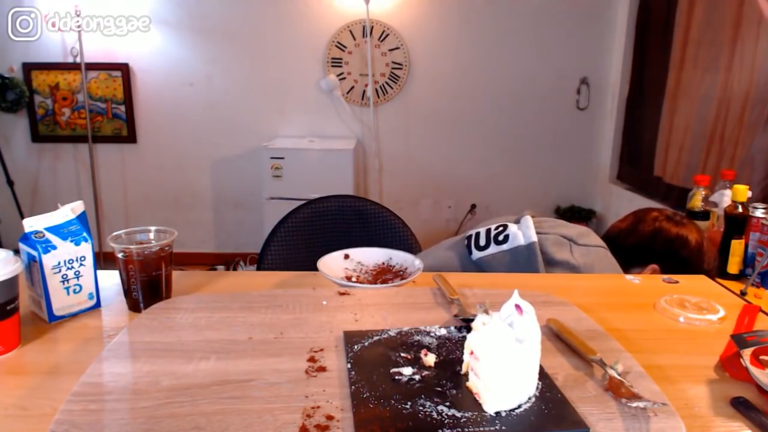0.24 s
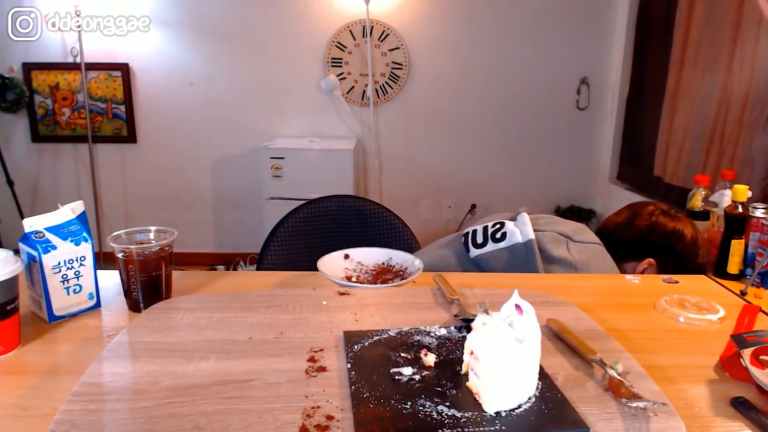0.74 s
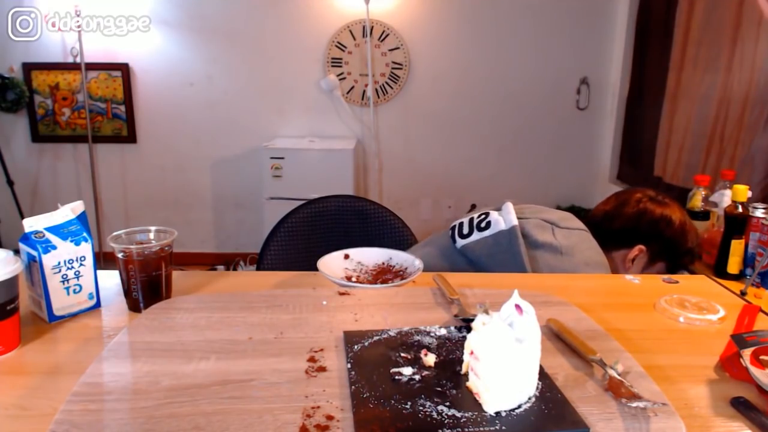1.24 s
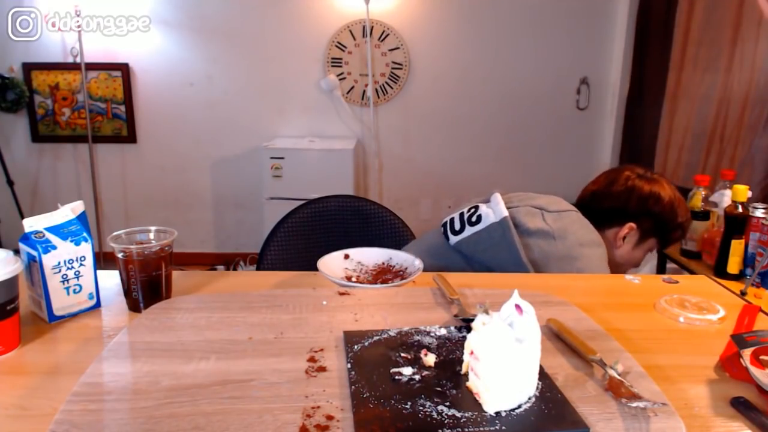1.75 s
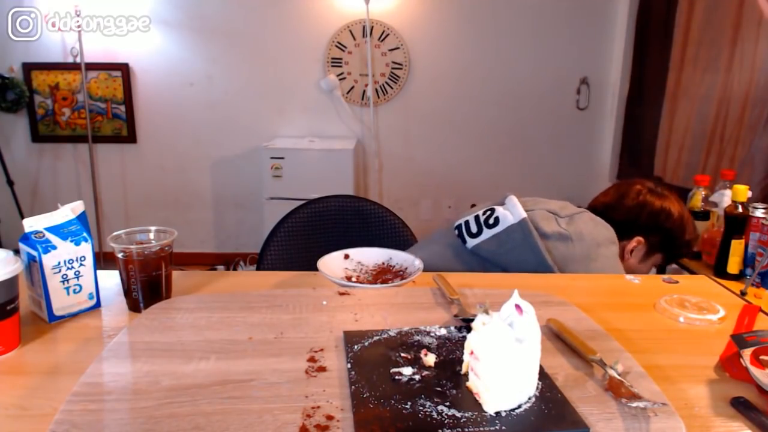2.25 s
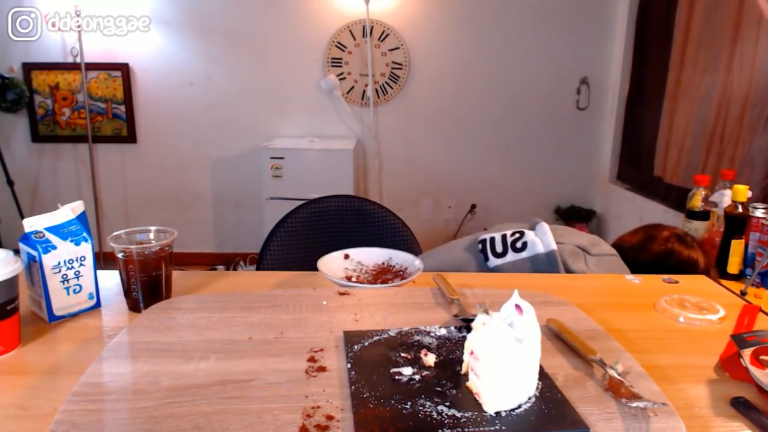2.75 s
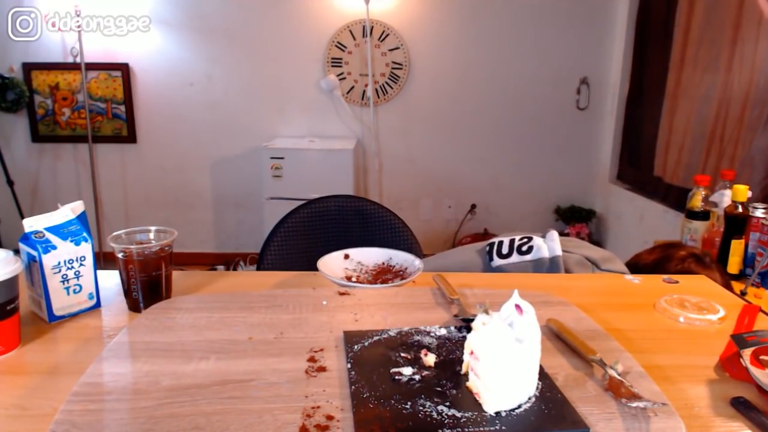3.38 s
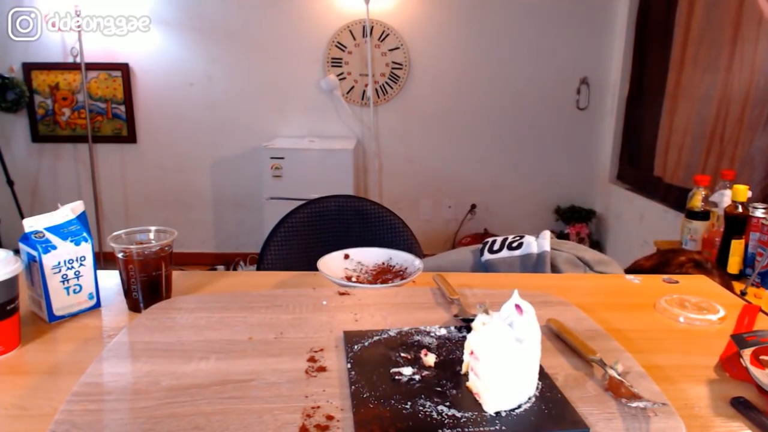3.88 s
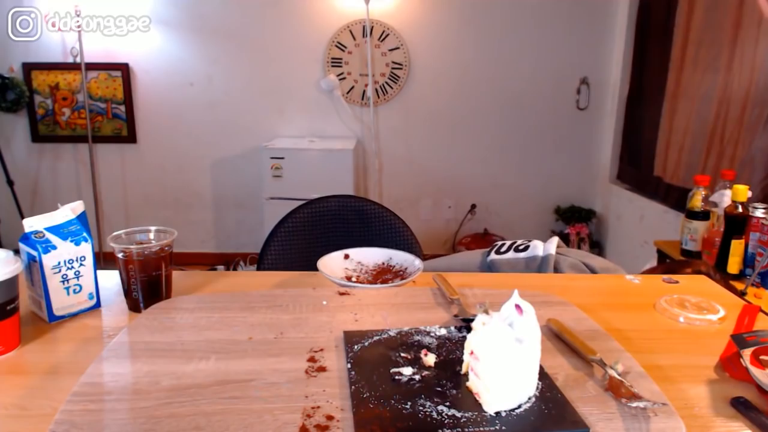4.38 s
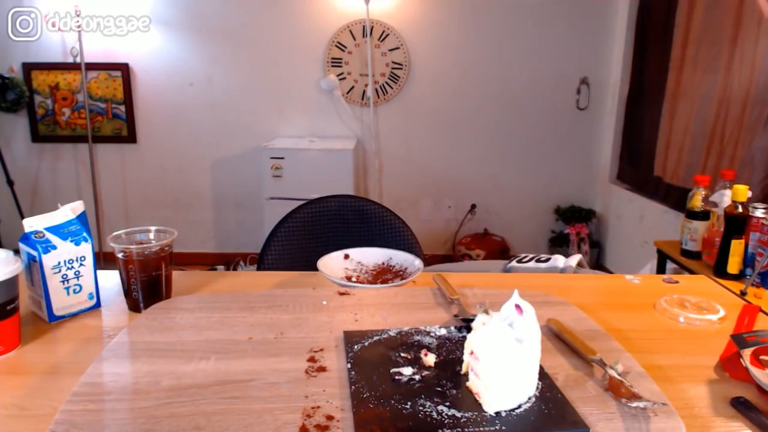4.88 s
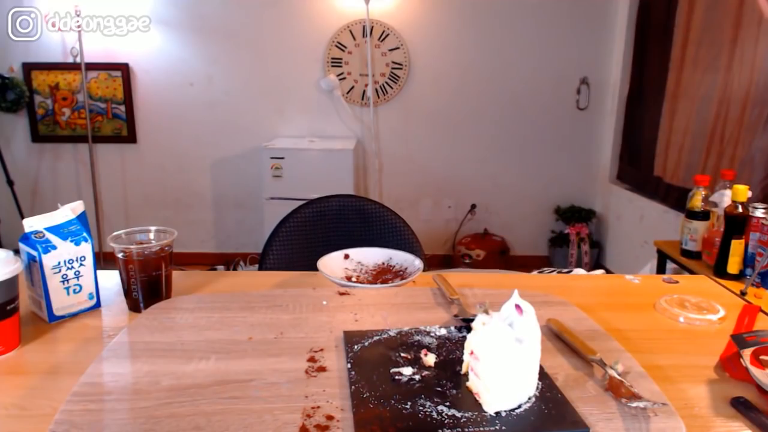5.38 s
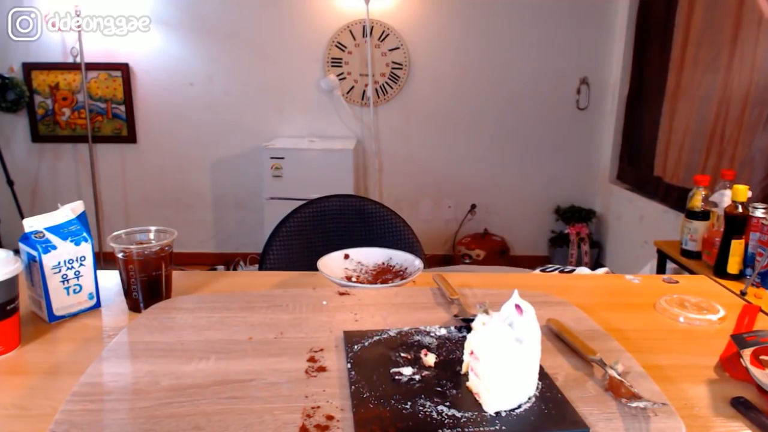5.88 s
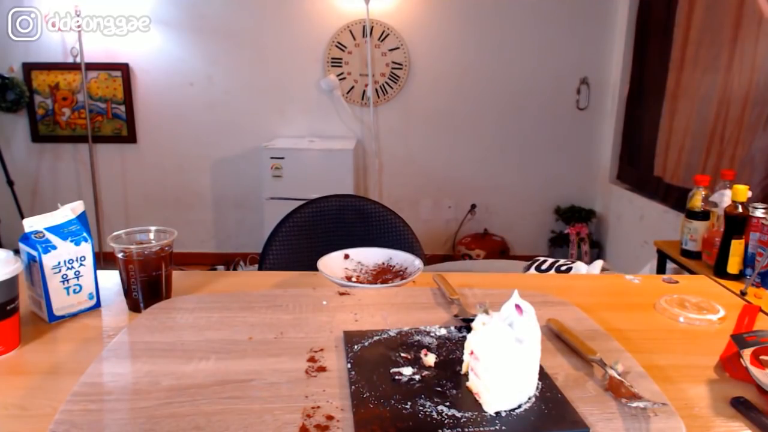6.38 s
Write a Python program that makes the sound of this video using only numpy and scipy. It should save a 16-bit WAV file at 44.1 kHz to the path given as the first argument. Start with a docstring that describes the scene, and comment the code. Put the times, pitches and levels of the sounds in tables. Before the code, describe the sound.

A microwave oven is handled in a bare, reverberant domestic room, with the microphone a few steps away and faint low hum and air noise throughout. At 0 s a hard knock with a short ping, then bumps at 0.2-0.4 s, light taps around 0.7-0.9, a duller heavy thud near 0.95 and smaller knocks to 1.8. At 2.25 s the door pops open with a loud double bang and ringing sheet metal. Rubbing and plastic clicks follow from 2.4 to 2.95, then a bright cluster of clacks at 3.05. Around 3.3 a dish touches down with a tiny squeak; knocks and scrapes continue to 3.9. From 4 to 5.5 only faint slides, ticks and squeaks. A firm knock comes at 5.7, a clear dish clink at 6.2, bumps at 6.45, and at 6.52 a massive, booming door slam, flattened and crackling, cut short by the end.

```python
"""A hard knock with a short ping opens the scene: a microwave oven handled in a bare, echoing room.
The microphone is a few steps away. The door pops open, a dish is knocked and slid about, the door slams.
Blows are noise shaped by the casing and a room tail; door panel, cabinet and dish are damped modes.
Slides are rubbed noise with tiny catches, squeaks are rough glides; air noise and a hum never stop.
The loudest blows overload the input stage, which flattens them and crackles."""
import sys
import numpy as np
from scipy.fft import rfft, irfft, next_fast_len
from scipy.io import wavfile
from scipy.ndimage import map_coordinates

SR = 44100
rng = np.random.default_rng(int(sys.argv[2]) if len(sys.argv) > 2 else 0)


def log_audio(samples):
    """Write samples as a 16-bit WAV file to the path given in sys.argv[1]."""
    # one column per channel
    frames = np.atleast_2d(samples).T
    # limit to full scale, then quantise
    limited = np.clip(frames, -1, 1)
    pcm = np.round(limited * 32767).astype(np.int16)
    wavfile.write(sys.argv[1], SR, pcm)


N = 292383

# The five voices of a contact, deep to bright, ahead of the casing's resonances.
# Each row: frequency in Hz, relative spectrum level in dB.
THUD_VOICE = [(25, -28), (55, 2), (100, 8), (150, 1), (220, -7), (500, -49), (1000, -120)]
BODY_VOICE = [(80, -55), (150, -9), (200, 1.5), (380, -3.5), (560, -12), (1200, -98), (2500, -120)]
KNOCK_VOICE = [(150, -69), (330, -11.5), (450, -1), (750, -3), (1100, -8), (1600, -21), (3000, -24),
               (8000, -110)]
CLACK_VOICE = [(400, -50), (950, -15), (1300, -4.5), (2300, -10.5), (3300, -13), (4500, -18.5), (8000, -29),
               (16000, -71)]
TICK_VOICE = [(1000, -64), (2500, 3.5), (3700, 2), (4700, 1), (6600, 2.5), (9000, -5), (12000, -11.5),
              (16000, -24)]
# Things sliding and shifting in and on the oven, one stroke a row.
# Each row: start in seconds, length in seconds, strength in dB, weight in dB (more rumble),
# hardness in dB (more hiss).
STROKES = [(0.422, 0.12, -48, 6.5, 6), (1.263, 0.17, -47, -2.5, -10), (2.063, 0.11, -42.5, -7.5, -4),
           (2.441, 0.17, -35.5, -2, -11), (2.632, 0.2, -44.5, 9, -2), (2.898, 0.12, -48.5, 4.5, -9),
           (3.26, 0.16, -40, -8, -3), (3.59, 0.18, -39.5, -4, 2.5), (3.78, 0.17, -35, -1.5, 8),
           (4.157, 0.3, -44, -4, -0.5), (5.254, 0.15, -55.5, 6, 0), (5.488, 0.32, -45.5, 0, -1.5)]


def amp(db):
    """Decibels to gain."""
    return 10 ** (np.asarray(db) / 20)


def unit(x):
    """Scaled to rms 1."""
    return x / np.sqrt(np.mean(x ** 2) + 1e-20)


def along(points, hz):
    """Values between (Hz, value) points, read on a log frequency axis."""
    f, v = np.transpose(points)
    return np.interp(np.log(hz + 1), np.log(f + 1), v)


def filtered(x, response):
    """The sound with its spectrum multiplied by a response of frequency."""
    padded = next_fast_len(len(x) + 4096)
    spectrum = rfft(x, padded) * response(np.fft.rfftfreq(padded, 1 / SR))
    return irfft(spectrum, padded)[:len(x)]


def wobble(rate, size):
    """A smooth random curve with rate knots a second."""
    knots = rng.standard_normal(int(size * rate / SR) + 4)
    return map_coordinates(knots, [np.arange(size) * rate / SR])


def fade(t, t60):
    """Exponential decay that falls 60 dB in t60 seconds."""
    return np.exp(-np.log(1000) * t / t60)


def add(track, s, sound):
    """Mixes a sound into the track at time s in seconds."""
    part = track[max(round(s * SR), 0):][:len(sound)]
    part += sound[:len(part)]


def knocks():
    """Door, latch and dish strike the oven, then settle with a second, smaller contact."""
    # Blows on the door and casing. Each row: start in seconds, strength in dB, weight in dB (more bass),
    # depth in dB (thud over body), hardness in dB (more treble, scaled for each voice),
    # basic rise in seconds (lengthened for deep voices).
    knock_rows = [(0.0, -17.5, 0, 5.5, 8.5, 0.00069), (0.231, -23, -9, 1, -9.5, 0.007),
                  (0.273, -23.5, -0.5, 2.5, 4, 0.0038), (0.358, -15.5, -0.5, 3, -1.5, 0.0039),
                  (0.696, -31.5, 7, 2, 2.5, 0.0046), (0.732, -28, 5, 2, 2.5, 0.002),
                  (0.793, -39, 10.5, 2, 7, 0.0019), (0.852, -31.5, 2, -7.5, 3, .008),
                  (0.956, -15, 4, -4, -9, 0.00075), (1.105, -22.5, -3.5, -1, 0.5, 0.0018),
                  (1.418, -26.5, -5.5, 4, -2, 0.0017), (1.543, -24, -9.5, 1, -2, 0.0026),
                  (1.726, -32.5, -12, 2, -11, 0.0017), (1.815, -27, -10, 1.5, 0, 0.001),
                  (2.229, -2.5, -5.5, -1, -5, 0.006), (2.256, -4.5, -5.5, 1, 2.5, 0.0013),
                  (2.282, -16, 0, -0.5, 0, .003), (2.414, -16, -2.5, -4.5, -1.5, 0.0026),
                  (2.564, -22.5, 1.5, 1.5, -1, 0.0031), (3.031, -22.5, 5.5, 6.5, 15, 0.0055),
                  (3.052, -12.5, -9.5, -0.5, 9.5, 0.0031), (3.08, -9.5, -3.5, -2, 4, .003),
                  (3.263, -26.5, -3.5, -0.5, 5.5, .0015), (3.333, -24, -7.5, 1, 3.5, 0.0012),
                  (3.351, -23, -6, -7, 5.5, 0.0037), (3.589, -30.5, 5, 1.5, 6, 0.0021),
                  (3.637, -16.5, -0.5, 3.5, -12, 0.01), (3.906, -18.5, 2, 2, -0.5, 0.0041),
                  (4.768, -41.5, 3.5, -4, -2, 0.0021), (5.199, -39, -5, -3, -3, 0.0022),
                  (5.585, -31.5, 0.5, -8, -5, 0.0059), (5.712, -15.5, -1.5, -4, -2.5, 0.0039),
                  (5.775, -24, 5, -6.5, -26, 0.0016), (6.152, -15.5, -16, -5.5, 0, 0.0025),
                  (6.188, -19, -5.5, -1.5, 9, 0.0014), (6.44, -9, -5.5, 2.5, 5, 0.0082),
                  (6.489, -13, -5, 0, 6, 0.008), (6.524, 0.5, -7.5, -0.5, 5.5, .0015),
                  (6.577, -11.5, 4.5, 1, 6, 0.0019)]
    s, db, weight_db, depth_db, hard_db, rise = np.transpose(knock_rows)
    first = blows(s, db, weight_db, depth_db, hard_db, rise)
    # the part drops back about 0.04 s later, weaker and duller; soft blows hardly bounce
    drop_s = s + 0.04 * (1 + rng.uniform(-.2, .2, len(s)))
    drop_db = db - 13 + 0.35 * np.minimum(hard_db, 0)
    return first + blows(drop_s, drop_db, weight_db + 3, depth_db, hard_db - 4, rise=0.0016)


def blows(s, db, weight_db, depth_db, hard_db, rise):
    """Each blow sounds in five voices, from the cabinet's thud to the tick of the contact."""
    thud_db = db + weight_db + depth_db - 9.5
    body_db = db + weight_db - depth_db - 9.5
    clack_db = db + 0.81 * hard_db - 16.0
    tick_db = db + 1.54 * hard_db - 23.5
    thud = strikes(s, thud_db, rise, THUD_VOICE, centre_hz=111, direct=0.58)
    body = strikes(s, body_db, rise, BODY_VOICE, centre_hz=315, direct=3.3)
    knock = strikes(s, db - 11, rise, KNOCK_VOICE, centre_hz=740, direct=3.1)
    clack = strikes(s, clack_db, rise, CLACK_VOICE, centre_hz=1970, direct=0.58)
    tick = strikes(s, tick_db, 1.5 * rise, TICK_VOICE, centre_hz=6000, direct=0.88)
    return thud + body + knock + clack + tick


def strikes(times, levels_db, rises, spectrum, centre_hz, direct, ripple_db=3.5, size=18000):
    """Each blow: a short crack, then the casing's ring scattered into a fresh room tail."""
    # How long the bare room rings. Each row: frequency in Hz, t60 in seconds.
    room_decay = [(80, 0.73), (300, 0.45), (1000, 0.42), (6000, 0.3)]
    t, hz = np.arange(size) / SR, np.fft.rfftfreq(size, 1 / SR)
    knots_hz = np.linspace(0, np.sqrt(SR / 2), 200) ** 2  # closer together in the bass
    colour = amp(along(spectrum, hz)) * casing(hz)
    crack = direct * fade(t, 0.012)
    decay = fade(t, along(room_decay, centre_hz)) + crack
    track = np.zeros(N)
    for s, db, rise in np.broadcast(times, levels_db, rises):
        # each point of contact favours its own set of narrow resonances
        ripple = amp(ripple_db * rng.standard_normal(len(knots_hz)))
        favoured = np.interp(hz, knots_hz, ripple)
        ring = irfft(rfft(rng.standard_normal(size)) * colour * favoured)
        # deep sounds take longer to build up
        shape = decay * (1 - np.exp(-t / (abs(rise) + 0.12 / centre_hz)))
        add(track, s, amp(db) * unit(ring * shape) * np.sqrt(np.mean(shape ** 2)))
    return track


def casing(hz):
    """Gain of the oven's sheet-metal panels, raised or lowered around each resonance."""
    # Each row: centre in Hz, width in Hz, gain at the centre in dB.
    panel_resonances = [(135.4, 32, 5), (272.3, 16, 8), (312, 27, -3.5), (431.5, 5.1, 8), (481, 21, 2),
                        (708, 42, 3), (898, 45, 2.5), (995, 8.6, 10), (1270, 30, 3.5), (1723, 48, 4.5),
                        (2070, 190, 3.5), (2214, 29, -2.5), (3320, 120, -1.5)]
    gain = 1
    for centre, width, db in panel_resonances:
        gain = gain + (amp(db) - 1) / (1 + (2 * (hz - centre) / width) ** 2)
    return gain


def door():
    """Opening, the door's panel rings; shutting, it sets the whole cabinet booming."""
    # The door springing open, then hitting its frame. Each: start in seconds, level in dB.
    pop = (2.256, -17)
    slam = (6.524, 9.1)
    # The door's sheet-metal modes, then the cabinet's deep ones.
    # Each row: frequency in Hz, level in dB, t60 in seconds.
    panel_modes = [(307.2, 4.5, 0.41), (397, -6, 0.93), (677, 7, 0.065), (925, 2, 0.26), (1287, -6.5, 0.36),
                   (1660, -1.5, .28), (1950, -5, 0.29), (2230, -8, 0.17), (2326, -0.5, 0.23),
                   (2950, -3, 0.11), (3325, -7.5, 0.26)]
    cabinet_modes = [(86.5, -11, 0.6), (141.5, 1.5, 0.23), (273, -22, 0.26), (392.7, -11.5, 0.19),
                     (593, -13.5, 0.13)]
    track = np.zeros(N)
    add(track, pop[0], amp(pop[1]) * ringing(panel_modes, blur=0.99, attack=0.00013))
    add(track, slam[0], amp(slam[1]) * ringing(cabinet_modes, blur=0.084, attack=0.00087))
    return track


def ringing(modes, blur, attack, size=24000):
    """Damped modes; reflections blur their strength and phase."""
    t = np.arange(size) / SR
    out = np.zeros(size)
    for hz, db, t60 in modes:
        scatter = 1 + blur * (wobble(131.6, size) + 1j * wobble(114.4, size))
        out += amp(db) * fade(t, t60) * np.imag(scatter * np.exp(2j * np.pi * hz * t))
    return out * (1 - np.exp(-t / attack))


def dish():
    """The dish rings briefly where it touches down; small hard parts ping."""
    # The dish touching down. Each row: start in seconds, level in dB.
    touchdowns = [(3.268, -43.5), (3.355, -36), (5.586, -40.5), (6.187, -18.5)]
    # The dish's modes. Each row: frequency in Hz, level in dB, t60 in seconds.
    dish_modes = [(1065, -7, 0.21), (1380, -5, 0.19), (1470, -10, 0.4), (1554, -5, 0.21),
                  (1780, -11.5, 0.18), (2920, -31, 0.14), (3460, -27, 0.35), (6040, -31, 0.24),
                  (6200, -43, 0.32)]
    # Small parts that ping. Each row: start in seconds, frequency in Hz, level in dB, t60 in seconds.
    ping_rows = [(0.001, 690, -25, 0.42), (1.989, 8200, -52.5, .25), (4.25, 6450, -51, 0.12),
                 (5.588, 3045, -42, 0.18), (5.714, 750, -29, 0.46)]
    track = np.zeros(N)
    for s, db in touchdowns:
        add(track, s, amp(db) * ringing(dish_modes, blur=1.0, attack=0.00015))
    for s, hz, db, t60 in ping_rows:
        add(track, s, amp(db) * ringing([(hz, 0, t60)], blur=0.8, attack=0.0019))
    return track


def clicks():
    """Light plastic contacts, too small to shake the cabinet, sound only in tick and clack."""
    # Each row: start in seconds, strength in dB, clack strength relative to it in dB.
    click_rows = [(1.6732, -33.5, -13.5), (1.989, -44.5, -12), (2.711, -33, -23), (2.7851, -34.5, -10),
                  (2.887, -31.5, -16), (2.9344, -23.5, -16), (4.187, -38, -11), (4.2507, -41, -24),
                  (4.4148, -38, -6.5), (5.4495, -38, -13), (5.889, -42, -10), (6.094, -47.5, -3.5),
                  (6.428, -50.5, 9.5)]
    s, db, clack_db = np.transpose(click_rows)
    tick = strikes(s, db - 11.0, 0.00057, TICK_VOICE, centre_hz=6000, direct=.4)
    clack = strikes(s, db + clack_db - 1.5, 0.00074, CLACK_VOICE, centre_hz=1990, direct=0.92)
    return tick + clack


def squeaks():
    """Stick and slip of the dish on the oven floor make a short, rough, gliding note."""
    # Each row: start in seconds, length in seconds, first pitch in Hz, last pitch in Hz,
    # level in dB (rms ahead of the fade in and out).
    squeak_rows = [(3.255, 0.067, 1075, 1025, -34), (3.316, 0.132, 1030, 969, -38),
                   (4.63, .15, 1313, 900, -54), (5.24, 0.21, 785, 810, -52.5)]
    track = np.zeros(N)
    for s, length, first_hz, last_hz, db in squeak_rows:
        size = int(length * SR)
        phase = 2 * np.pi * np.cumsum(np.linspace(first_hz, last_hz, size)) / SR
        note = wobble(157.5, size) * np.sin(phase) + wobble(180, size) * np.cos(phase)
        add(track, s, amp(db) * unit(note) * np.sqrt(np.hanning(size)))
    return track


def slides():
    """Friction catches and slips unevenly, driving the same panels as the blows."""
    t = np.arange(SR) / SR
    grip = amp(2.0 * wobble(45, N))
    starts, lengths, db, weight_db, hard_db = np.transpose(STROKES)
    # each blend: main voice, second voice, gain of the second in dB, level of every stroke in dB
    rumble = (THUD_VOICE, BODY_VOICE, -4, db + weight_db + 2)
    rub = (KNOCK_VOICE, CLACK_VOICE, -7, db - 4.5)
    hiss = (TICK_VOICE, CLACK_VOICE, -1, db + hard_db - 12.5)
    out = np.zeros(N)
    for main, second, second_db, levels_db in (rumble, rub, hiss):
        def colour(hz):
            """The two voices blended and passed through the casing."""
            return (amp(along(main, hz)) + amp(along(second, hz) + second_db)) * casing(hz)

        pressure = np.zeros(N)
        for s, length, level_db in zip(starts, lengths, levels_db):
            add(pressure, s, amp(level_db) * stroke(t, length))
        out += pressure * unit(filtered(rng.standard_normal(N), colour) * grip)
    return out


def stroke(t, length):
    """Envelope of one slide: it takes hold, presses harder as it goes, and dies away."""
    attack_s, swell_db, release_t60 = 0.022, 4.5, 0.26
    hold = np.clip(t / attack_s, 0, 1)
    swell = amp(swell_db * (np.clip(t / length, 0, 1) - .5))
    return hold * swell * fade(np.maximum(t - length, 0), release_t60)


def catches():
    """A sliding edge catches now and then in tiny contacts at random moments."""
    per_second, relative_db, scatter_db = 22, -6.5, 3
    contacts = []
    for start, length, level_db, _, hardness_db in STROKES:
        for _ in range(round(per_second * length)):
            moment = start + length * rng.uniform()
            catch_db = level_db + relative_db + scatter_db * rng.standard_normal()
            contacts.append((moment, catch_db, hardness_db))
    s, db, hard_db = np.transpose(contacts)
    clack = strikes(s, db - 3.5, 0.0008, CLACK_VOICE, centre_hz=2000, direct=1.2)
    tick = strikes(s, db + hard_db - 9.5, 0.0006, TICK_VOICE, centre_hz=6000, direct=1.1)
    return clack + tick


def background():
    """Room noise and an appliance's hum, its sine tones slightly unsteady in phase."""
    # Spectrum of the room noise. Each row: frequency in Hz, relative level in dB.
    air_spectrum = [(15, -53), (25, -21), (49, 6), (91, -7), (122, 0), (152, -9.5), (281, -10.5),
                    (322, -13), (703, -19.5), (1080, -24.5), (1170, -24), (1800, -31), (15500, -43)]
    # The hum's tones. Each row: frequency in Hz, rms level in dB.
    hum_tones = [(43, -48), (118.5, -49.5), (199, -57.5), (274.5, -62.5)]
    t = np.arange(N) / SR
    air = unit(filtered(rng.standard_normal(N), lambda hz: amp(along(air_spectrum, hz))))
    hum = np.zeros(N)
    for hz, db in hum_tones:
        hum += amp(db) * np.sqrt(2) * np.sin(2 * np.pi * hz * t + .4 * wobble(2.7, N))
    return amp(-44.0) * air + hum


def scene():
    """Everything reaches one microphone."""
    handling = knocks() + door() + dish() + clicks()
    friction = squeaks() + slides() + catches()
    return (handling + friction + background())[None]


def record(dry, ceiling=0.7, hardness=8, overload=1.6, crackle=0.4, leak=0.02):
    """The input stage all but flattens loud peaks and crackles when driven far over; the band is limited."""
    top_hz = 15750
    drive = np.abs(dry[0] / ceiling)
    limiting = 1 / (1 + drive ** hardness) ** (1 / hardness)
    clipped = dry[0] * (leak + (1 - leak) * limiting)
    # brief random drops in gain, only where the drive exceeds the overload point
    dropouts = (drive > overload) * (wobble(5000, N) > 1.2)
    return filtered(clipped * (1 - crackle * dropouts), lambda hz: hz < top_hz)[None]


dry = scene()
out = record(dry)
log_audio(out)
```